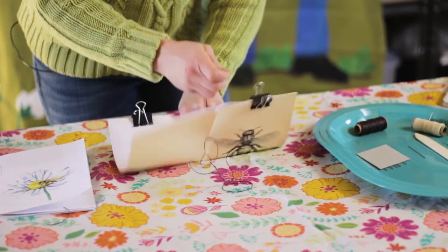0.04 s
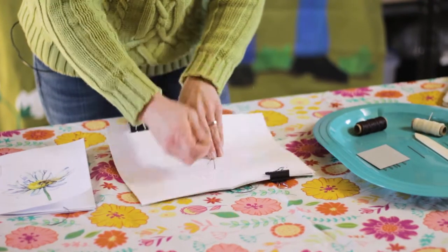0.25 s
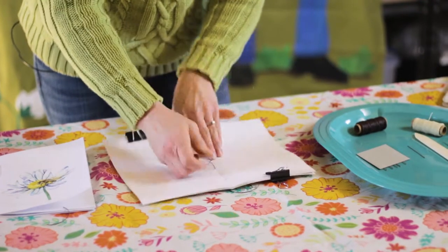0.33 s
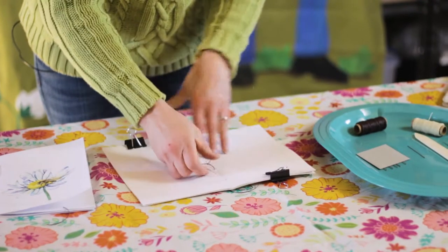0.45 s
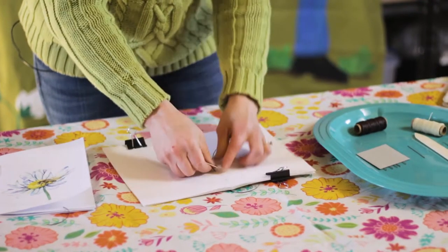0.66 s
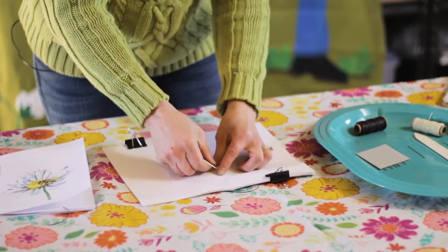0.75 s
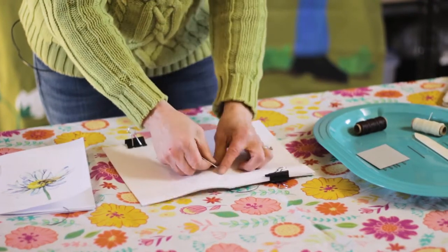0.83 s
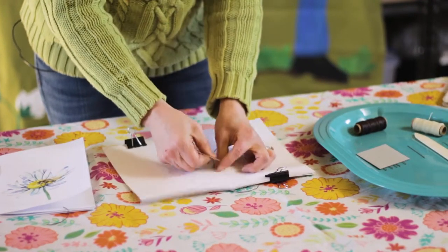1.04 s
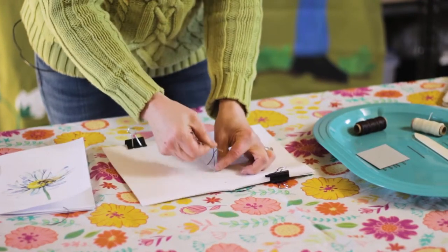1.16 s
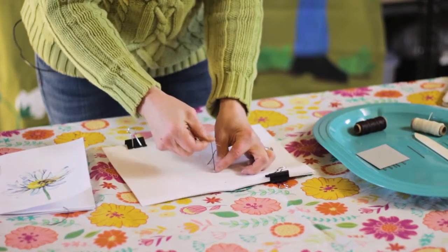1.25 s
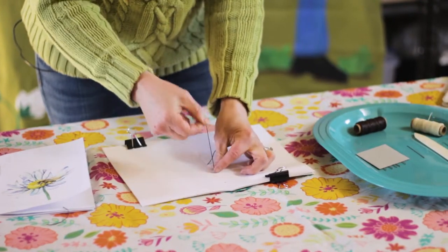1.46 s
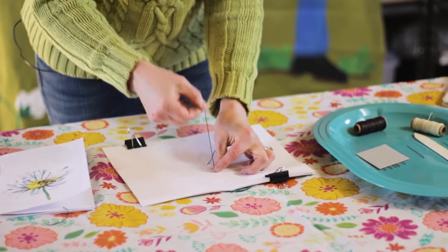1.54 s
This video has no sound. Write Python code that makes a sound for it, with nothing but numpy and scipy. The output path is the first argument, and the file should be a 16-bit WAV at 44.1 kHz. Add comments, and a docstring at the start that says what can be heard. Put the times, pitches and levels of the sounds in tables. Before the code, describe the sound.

A sheet of paper with metal clips swishes faintly, then lands on a table at 0.2 seconds with a sharp click and slap, the loudest sound. Fingers rub and press the sheet, making dry ticks and dull pops, clearest at 0.4, 0.8 and 1.1 seconds. From 1.1 to 1.6 seconds thread rasps softly through the paper. It is close, in a small room with faint rumble and hiss.

```python
"""A sheet of paper with metal clips swishes through the air and drops onto a cloth-covered table in a
small room. The impact excites the modes of a clip and the table top: one sharp crack and a thud.
Fingers then press the sheet, which buckles in dull pops and dry ticks, and thread drags through a
hole, rasping by stick-slip friction. Room rumble and hiss lie under it all, heard nearly in mono."""
import sys
import numpy as np
from scipy import signal
from scipy.fft import rfft, irfft
from scipy.io import wavfile

SR = 44100
rng = np.random.default_rng(int(sys.argv[2]) if len(sys.argv) > 2 else 0)


def put_to_file(sound):
    """Save the sound as 16-bit audio at rate SR, in the file named by the first command-line argument."""
    columns = np.atleast_2d(sound).T  # one column per channel
    safe = np.clip(columns, -1, 1)
    whole_steps = np.round(safe * 32767)
    wavfile.write(sys.argv[1], SR, whole_steps.astype(np.int16))


N = 70560

CLIP_MODES = [(2085, 5.5, 0.0031), (3293, -9, 0.005), (5280, 2, 0.007), (6990, 1.5, 0.0057),
              (10560, -14.5, 0.009), (13160, -6.5, 0.0031), (14800, -10, .004)]
TABLE_MODES = [(119, -13, 0.13), (171.6, -6, 0.046), (251, -10.5, 0.1), (380, 1.5, 0.032),
               (559.5, -10.5, 0.18), (688, 1, 0.03), (868, -4.5, 0.069), (997, 6, 0.032), (1139, 0, 0.054),
               (1383, -0.5, 0.027), (1750, -36, .03), (2290, -12, 0.016)]
# The sheet slapping flat. Each row: frequency in Hz, relative spectral density in dB.
SLAP_SPECTRUM = [(300, -29), (1200, -25.5), (2200, -36.5), (3500, -16.5), (4400, -25), (5300, -11.5),
                 (7500, -18.5), (11900, -27.5), (13300, -23), (16000, -32)]
# Gains of the crack, the thud and the slap, in dB.
IMPACT_GAINS = (-12.5, -23.5, -24.5)

def impact(start_s=.2007, crack_rise_s=.0004, slap_t60_s=.061, low_cut_hz=90):
    crack_db, thud_db, slap_db = IMPACT_GAINS
    out, t = np.zeros(N), np.arange(SR // 4) / SR
    slap = unit_rms(coloured(rng.standard_normal(len(t)), SLAP_SPECTRUM))
    slap *= gain_of(slap_db - 60 * t / slap_t60_s) * np.minimum(t / crack_rise_s, 1)
    crack = gain_of(crack_db) * ring(CLIP_MODES, crack_rise_s)
    add(out, start_s - .0014, gain_of(-24) * crack)  # the edge's light first touch
    add(out, start_s, crack)
    add(out, start_s, slap)
    add(out, start_s, gain_of(thud_db) * ring(TABLE_MODES, rise_s=.004))
    return signal.sosfilt(signal.butter(2, low_cut_hz, "high", fs=SR, output="sos"), out)


def ring(modes, rise_s):
    """Modal superposition: a struck body vibrates as a sum of exponentially damped sines."""
    t = np.arange(SR // 2) / SR
    partials = (gain_of(db - 60 * t / t60) * np.sin(2 * np.pi * hz * t) for hz, db, t60 in modes)
    return np.minimum(t / rise_s, 1) * sum(partials)


# Pops of the sheet. Each row: start in seconds, envelope peak in dB, pitch in Hz, number of cycles.
POPS = [(.1155, -41, 1006, 7.9), (.134, -60, 920, 6.5), (0.4072, -28, 1120, 2.44), (0.7122, -49, 1400, 3),
        (.743, -56.5, 1550, 2.5), (0.7934, -37.5, 1600, 2.5), (0.7946, -51, 3670, 5.2),
        (.9335, -47, 630, 2.3), (.048, -47.5, 447, 1.6), (.485, -48.5, 1020, 2), (.612, -54, 1285, 9.4),
        (1.054, -51, 1188, 6.8), (1.0976, -27, 990, 2.04), (1.097, -44.5, 280, 2.7),
        (1.099, -35.5, 1370, 8), (1.084, -47.5, 1120, 2.1), (1.109, -37.5, 1060, 5.4),
        (1.115, -52, 1200, 3.2), (1.195, -39, 1370, 4.3), (1.202, -51, 1480, 6.6), (1.269, -45.5, 1370, 6),
        (1.396, -44, 1390, 3.8)]

def pops():
    """Buckling: the sheet gives way and radiates a few cycles under a rounded swell."""
    out = np.zeros(N)
    for start, db, hz, cycles in POPS:
        progress = np.arange(0, cycles / hz, 1 / SR) * hz / cycles
        swell = np.sin(np.pi * progress ** .7) ** 2
        add(out, start, -gain_of(db) * swell * np.sin(2 * np.pi * progress * cycles))
    return out


# Dry crackles of paper. Each row: start in seconds, level in dB, length in seconds.
TICKS = [(.013, -55, 0.0033), (.128, -57, 0.00077), (.1675, -46.5, 0.0019), (.1745, -49.5, 0.0019),
         (.4068, -45, 0.0017), (.444, -57, 0.0092), (.513, -63, 0.0054), (.523, -61, 0.0018),
         (.538, -56, 0.0014), (.610, -61.5, 0.016), (1.0975, -52, 0.017), (1.195, -62, 0.017),
         (1.226, -54.5, 0.0011), (1.26, -63, 0.0014), (1.323, -63.5, 0.0044), (1.365, -63.5, 0.0015),
         (1.397, -57.5, 0.0031), (1.453, -60, 0.00094), (1.494, -61, 0.0015)]
# Their timbre. Each row: frequency in Hz, relative spectral density in dB.
TICK_SPECTRUM = [(500, -15.5), (1280, -1.5), (2540, -24.5), (3300, -16), (4300, -20), (5200, -9),
                 (8000, -10), (9500, -18.5), (12000, -19.5), (16000, -18)]

def ticks():
    """Crackling noise: paper emits brief broadband bursts of uneven grains that start and stop sharply."""
    t, envelope = np.arange(N) / SR, np.zeros(N)
    for start, db, length in TICKS:
        envelope += gain_of(db) * (t > start) * np.exp(-(np.maximum(t - start, 0) / length) ** 4)
    grit = rng.standard_normal(N) * gain_of(2.5 * rng.exponential(1, N))
    grit /= np.std(coloured(grit, TICK_SPECTRUM))
    return coloured(envelope * grit, TICK_SPECTRUM)


# The sheet turning in the air, then the rubbing on it. Each row: time in seconds, levels of body,
# hiss and finest hiss in dB, body pitch in Hz.
SWING = [(0, -60, -72, -72.5, 950), (0.024, -68, -66, -67.5, 950), (.055, -76, -71.5, -83, 950),
         (.075, -64, -66, -75, 950), (.105, -70.5, -69.5, -78, 950), (.12, -61.5, -85, -83, 1010),
         (.155, -68, -75, -84, 1010), (.19, -61, -60.5, -70, 1000)]
RUB = [(.36, -70.5, -76, -81, 1100), (0.391, -89, -67, -72.5, 1150), (0.426, -54, -70, -72.5, 1068),
       (.46, -66.5, -77, -77, 1060), (0.503, -70, -77.5, -82, 1137), (.53, -60, -76, -74, 1335),
       (.575, -75, -77.5, -81, 1200), (.66, -74.5, -82, -88.5, 1070), (.71, -75, -79, -94, 1300),
       (0.751, -63.5, -70.5, -76, 1400), (.785, -74.5, -75.5, -77.5, 1416), (.815, -64, -87, -98, 1900),
       (0.859, -68, -83, -88, 1300), (.92, -70, -76.5, -77, 1213), (1.0, -65.5, -73, -72, 1200),
       (1.04, -69, -78, -79, 1170), (1.06, -66.5, -67, -71, 1100), (1.09, -61.5, -68, -68, 1150),
       (1.12, -50.5, -68.5, -80, 1200), (1.155, -57, -70, -87, 1500), (1.185, -60.5, -69.5, -88, 1430),
       (1.205, -52.5, -70, -90, 1500), (1.26, -58, -66, -77, 1550), (1.3, -63, -84, -90, 1400),
       (1.35, -64, -76, -82, 1350), (1.41, -59, -72, -85, 1450), (1.45, -66.5, -82, -92, 1250),
       (1.49, -57, -78, -86.5, 1300), (1.525, -52.5, -63.5, -84, 1400), (1.55, -54.5, -68.5, -75, 1350),
       (1.58, -52.5, -67.5, -73, 1250), (1.6, -52.5, -70, -83, 1260)]
# Friction hiss and its finest part. Each row: frequency in Hz, relative spectral density in dB.
HISS_SPECTRUM = [(600, -28), (1800, 3.5), (2400, -12), (3600, -6), (5100, -6.5), (8000, -4), (9500, -17.5),
                 (16000, -32)]
FINE_SPECTRUM = [(6000, -38), (9500, -3.5), (13000, -9), (16000, -17)]

def friction(slips_per_s=3200, spread_db=3, body_width_hz=850):
    """Stick-slip friction: fibres catch and let go, each slip rings the sheet, and hiss goes with it."""
    t = np.arange(N) / SR
    times, body_db, hiss_db, fine_db, body_hz = np.transpose(SWING + RUB)
    slipping = rng.random(N) < slips_per_s / SR
    strength = gain_of(spread_db * np.minimum(rng.exponential(1, N), 4))
    slips = slipping * strength * rng.choice([-1., 1.], N)
    body = slips
    for _ in range(3):  # resonances in series steepen the band's flanks
        body = resonate(body, np.interp(t, times, body_hz), body_width_hz)
    body = unit_rms(body) + gain_of(-3.5) * unit_rms(resonate(slips, hz=700, width_hz=690))
    fuzz = .5 * unit_rms(slips) + rng.standard_normal(N)
    hiss = unit_rms(coloured(fuzz, HISS_SPECTRUM))
    fine = unit_rms(coloured(fuzz, FINE_SPECTRUM))
    layers = [(body_db, body), (hiss_db, hiss), (fine_db, fine)]
    return sum(gain_of(np.interp(t, times, db)) * layer for db, layer in layers)


# The rustle's envelope, before and after the impact. Each row: time in seconds, level in dB.
RUSTLE_LEVELS = [
    [(0.0, -55), (0.014, -66), (0.03, -64), (0.05, -57), (0.082, -88), (0.12, -58), (0.174, -83),
     (0.184, -90), (0.19, -62)],
    [(0.42, -64.5), (0.612, -75), (0.944, -63.5), (1.066, -88.5), (1.096, -53.5), (1.152, -69),
     (1.468, -73.5), (1.576, -62.5), (1.6, -89)],
]

def rustle(hz=352, width_hz=670):
    """Amplitude-modulated band noise: sheet and cloth shift with a soft, low rustle."""
    times, db = np.transpose(np.concatenate(RUSTLE_LEVELS))
    band = resonate(resonate(rng.standard_normal(N), hz, width_hz), hz, width_hz)
    return gain_of(np.interp(np.arange(N) / SR, times, db)) * unit_rms(band)


# Reflections from nearby surfaces. Each row: delay in seconds, relative level in dB.
ECHOES = [(.0065, -3.5), (.012, -19), (.017, -15.5), (.023, -1), (.037, -11)]
# Reverberation time. Each row: frequency in Hz, T60 in seconds.
ROOM_T60 = [(100, .6), (260, 0.35), (700, 0.35), (1840, 0.31), (4850, 0.27), (12800, 0.2)]
# Filters for the early echoes and for all reflected sound. Each row: frequency in Hz, gain in dB.
ECHO_RESPONSE = [(100, -7.5), (2000, -3), (6000, -11), (16000, -1)]
ROOM_RESPONSE = [(100, -8), (500, 1.5), (1200, 0), (2500, 0.5), (5000, -16.5), (13000, -15.5)]

def room(x):
    """Reverberation: a few early reflections and a dense tail whose bands decay at their own rates."""
    taps, early = np.zeros(SR), np.zeros(SR // 4)
    slots = np.arange(200, SR - 20, 10)  # one reflection in every ten samples
    taps[slots + rng.integers(0, 10, len(slots))] = rng.choice([-1., 1.], len(slots))
    hz, t, bands = signal.stft(taps, SR, nperseg=256)
    decay = gain_of(-60 * t / curve_at(ROOM_T60, hz)[:, None])
    response = signal.istft(bands * decay, SR, nperseg=256)[1]
    response /= np.linalg.norm(response)
    for delay, db in ECHOES:
        add(early, delay, gain_of([db]))
    add(response, 0, coloured(early, ECHO_RESPONSE))
    return coloured(signal.fftconvolve(x, response)[:N], ROOM_RESPONSE)


# Rumble and hiss common to both channels, and the hiss that differs between them.
# Each row: frequency in Hz, relative spectral density in dB.
FLOOR_SPECTRUM = [(20, -28.5), (40, -6), (60, 2), (80, -11), (105, 0), (130, -11), (150, -8), (200, -15.5),
                  (400, -21), (950, -16), (1500, -33), (2300, -27.5), (5000, -38.5), (16000, -38)]
SIDE_SPECTRUM = [(12, -23.5), (20, 2), (718, -12.5), (1000, -23), (1090, -18), (1290, -26), (3070, -14.5),
                 (14300, -11.5), (16000, -10.5)]

def background(spectrum, db):
    """Stationary noise: white noise weighted in frequency gives steady rumble and hiss."""
    weights = gain_of(curve_at(spectrum, np.fft.rfftfreq(N, 1 / SR)))
    return gain_of(db) * unit_rms(irfft(rfft(rng.standard_normal(N)) * weights, N))


def coloured(x, spectrum):
    """Minimum-phase filtering: the phase follows from the log gain by the Hilbert transform."""
    log_gain = curve_at(spectrum, abs(np.fft.fftfreq(4096, 1 / SR))) * np.log(10) / 20
    taps = np.fft.ifft(np.exp(np.conj(signal.hilbert(log_gain)))).real[:2048]
    return signal.oaconvolve(x, taps)[:len(x)]


def resonate(x, hz, width_hz):
    """Resonance: a damped oscillator driven by x, its centre frequency following hz."""
    carrier = np.exp(2j * np.pi * np.cumsum(hz * np.ones(len(x))) / SR)
    pole = np.exp(-np.pi * width_hz / SR)
    return 2 * (carrier * signal.lfilter([1 - pole], [1, -pole], x / carrier)).real


def curve_at(points, hz):
    """Interpolation on a logarithmic frequency axis."""
    knots_hz, values = np.transpose(points)
    return np.interp(np.log(hz + 1), np.log(knots_hz + 1), values)


def gain_of(db):
    """Decibels as an amplitude ratio."""
    return 10 ** (np.asarray(db) / 20)


def unit_rms(x):
    """Normalisation to unit power."""
    return x / np.sqrt(np.mean(x ** 2) + 1e-20)


def add(mix, start_s, sound):
    """Superposition of a sound onto the mix, in place."""
    part = mix[round(start_s * SR):][:len(sound)]
    part += sound[:len(part)]


def scene():
    """Mid-side stereo: all sources lie in the middle, and only a trace of hiss differs left to right."""
    drop, handling = impact(), pops() + ticks()
    reflections = room(drop + gain_of(-13) * handling)
    mid = drop + handling + reflections + friction() + rustle() + background(FLOOR_SPECTRUM, db=-62)
    side = background(SIDE_SPECTRUM, db=-75)
    return np.array([mid + side, mid - side])


def record(dry):
    """Band limiting: a linear-phase low-pass removes the treble above 15.9 kHz."""
    low_pass = signal.firwin(511, 15900, window=("kaiser", 9), fs=SR)
    return signal.oaconvolve(dry, low_pass[None], "same")


dry = scene()
out = record(dry)
put_to_file(out)
```